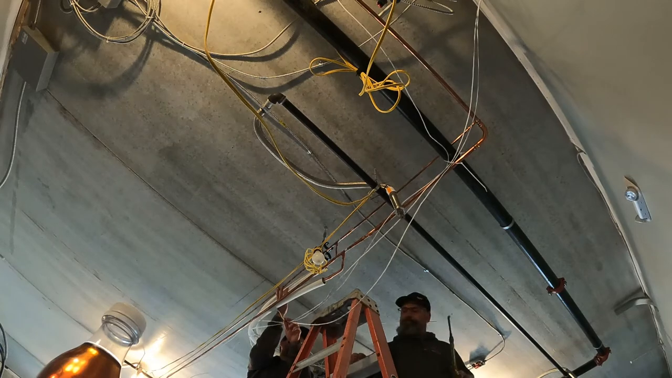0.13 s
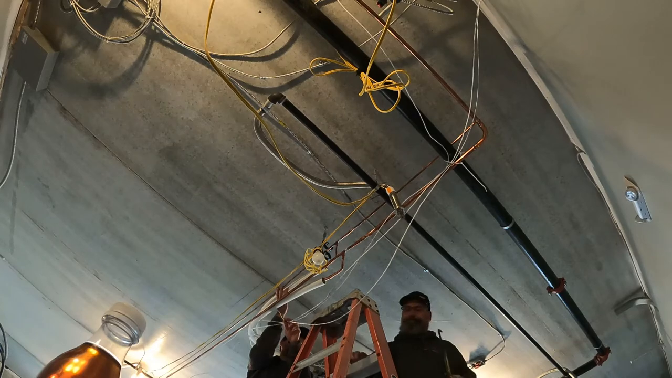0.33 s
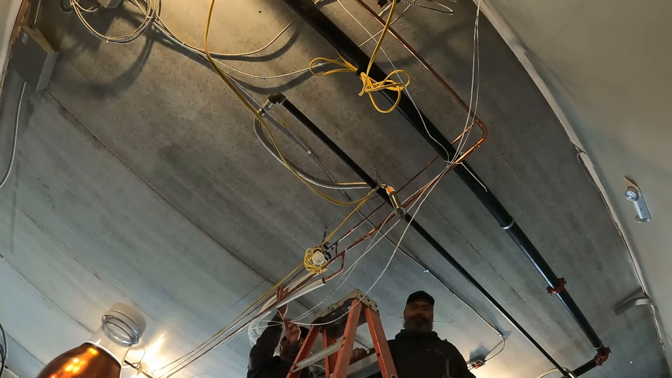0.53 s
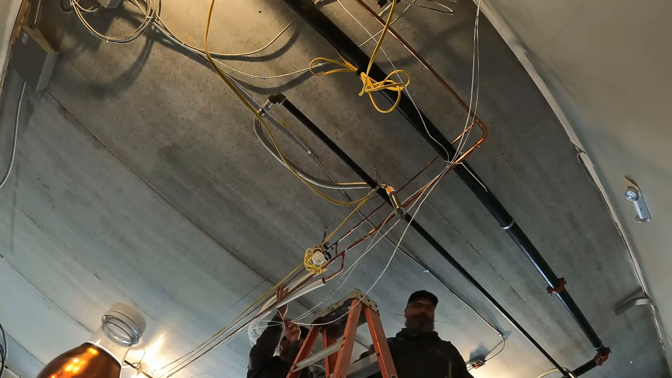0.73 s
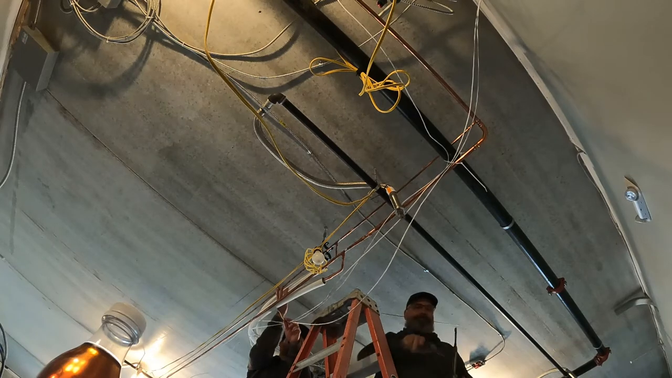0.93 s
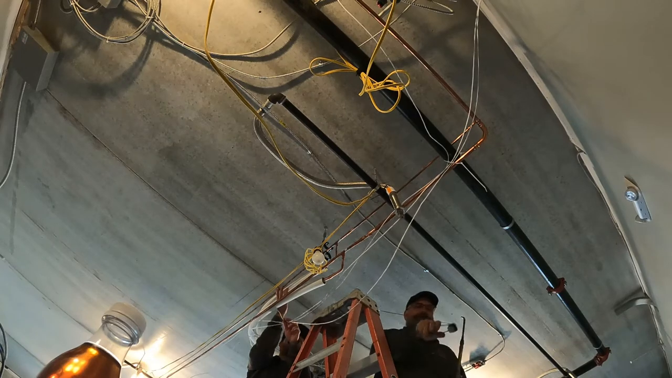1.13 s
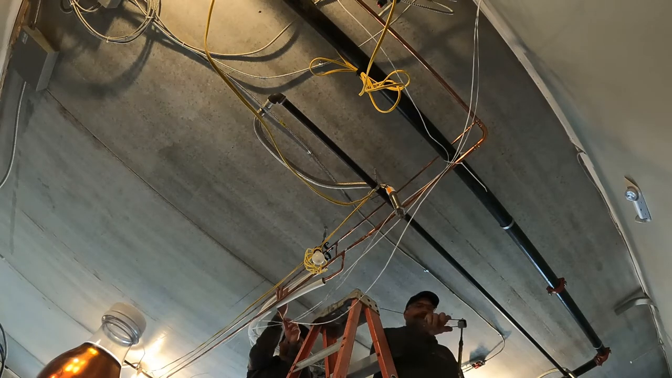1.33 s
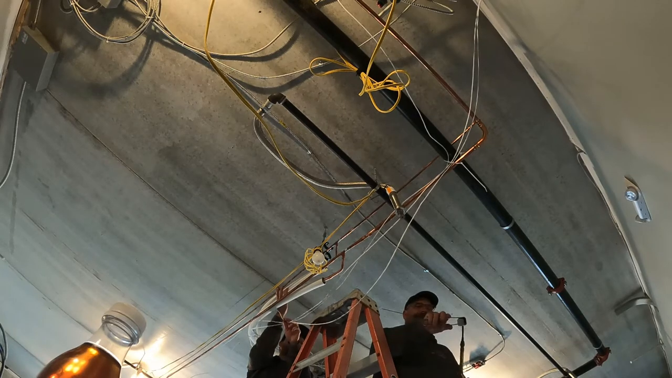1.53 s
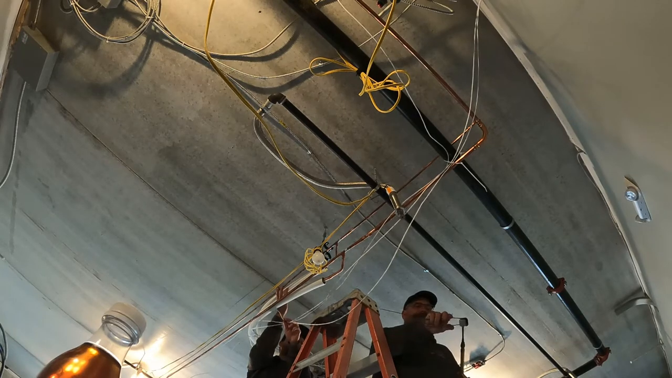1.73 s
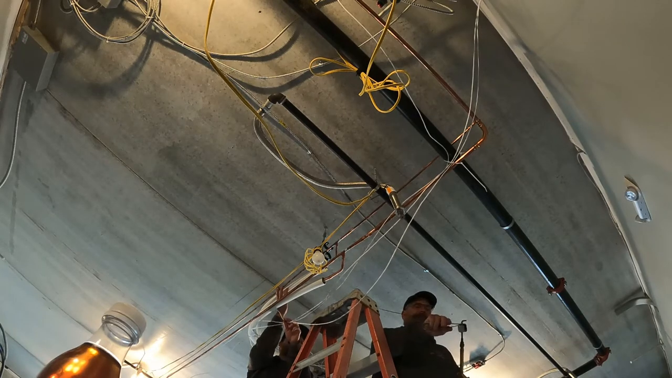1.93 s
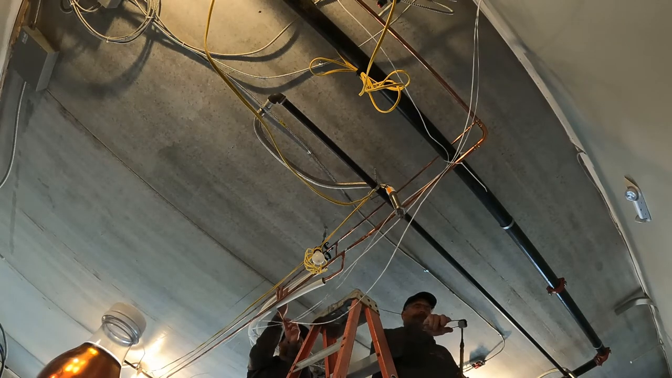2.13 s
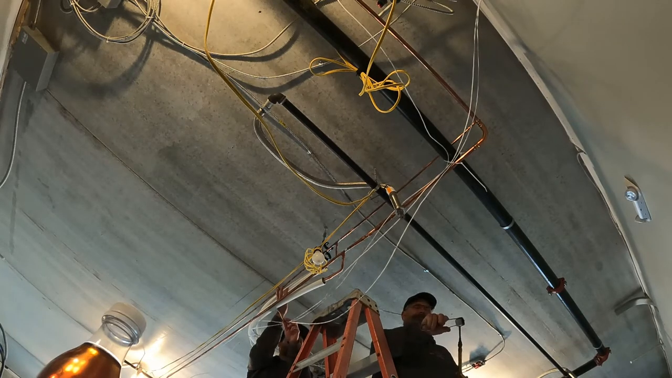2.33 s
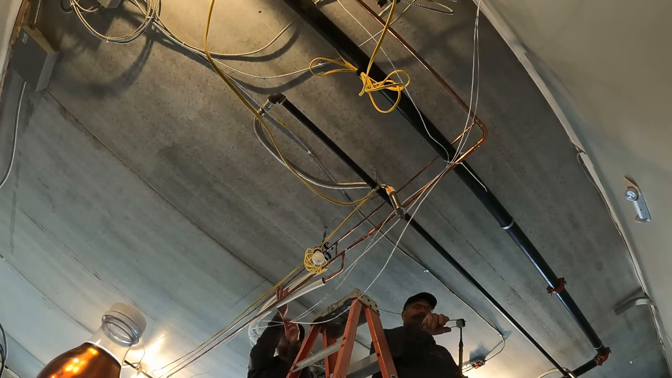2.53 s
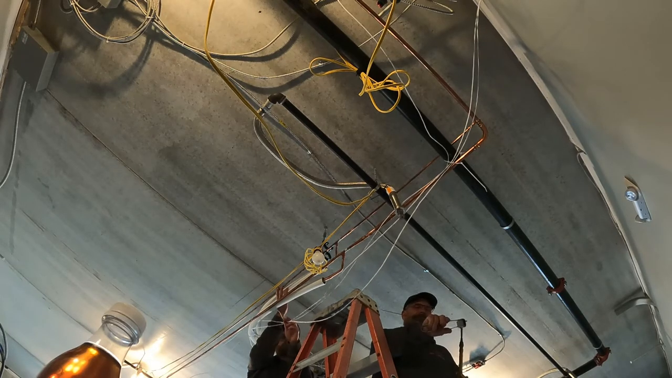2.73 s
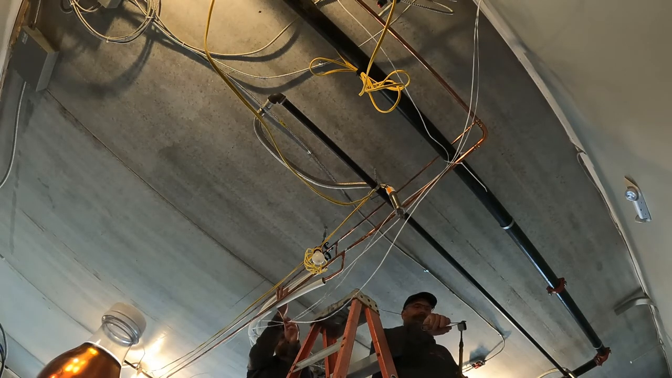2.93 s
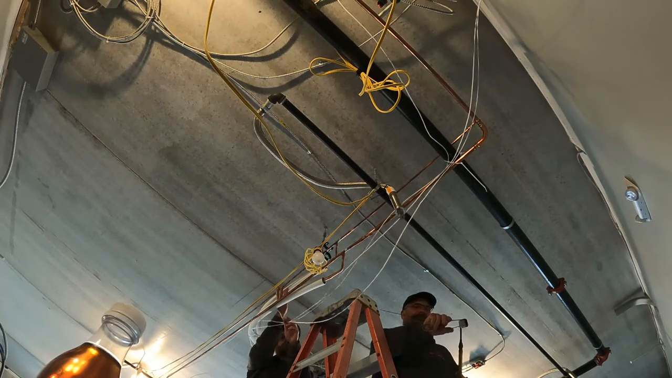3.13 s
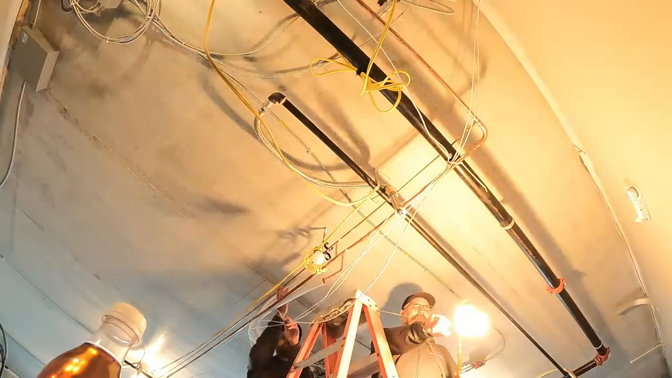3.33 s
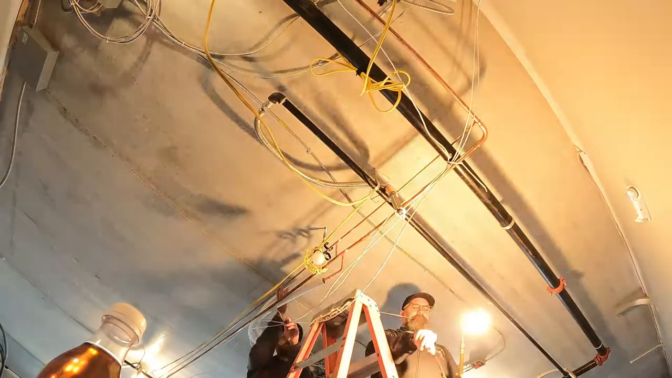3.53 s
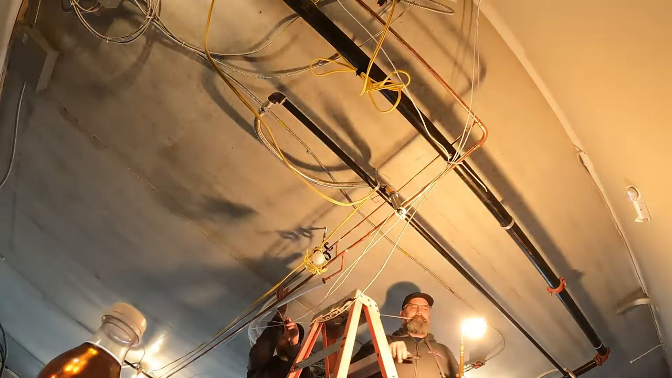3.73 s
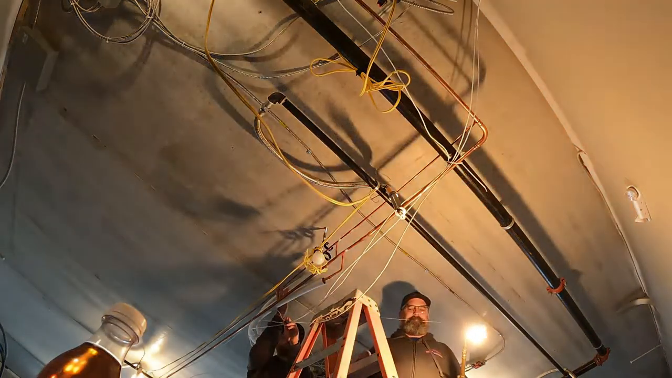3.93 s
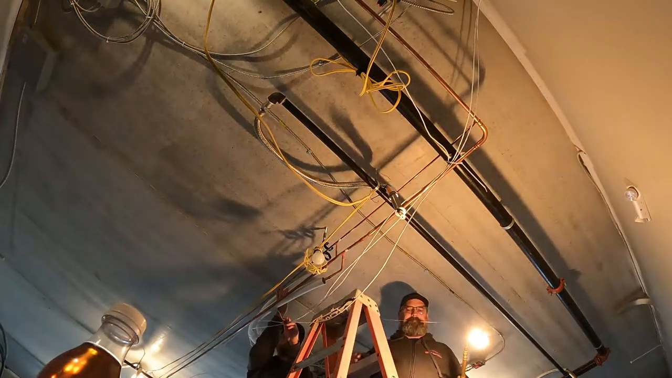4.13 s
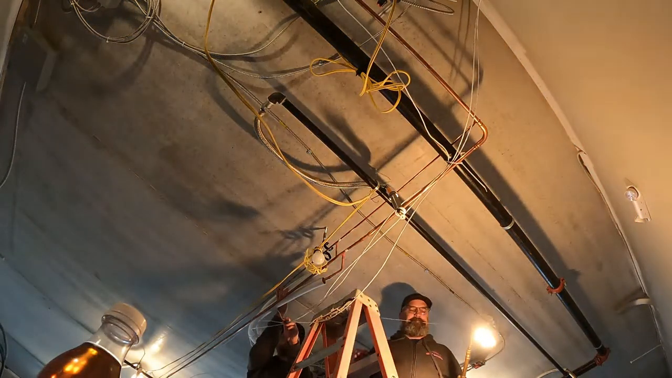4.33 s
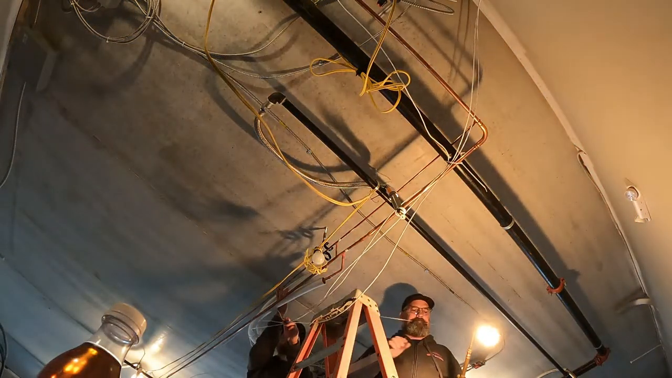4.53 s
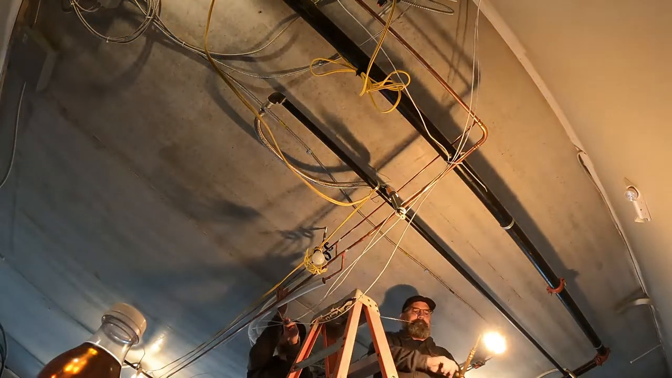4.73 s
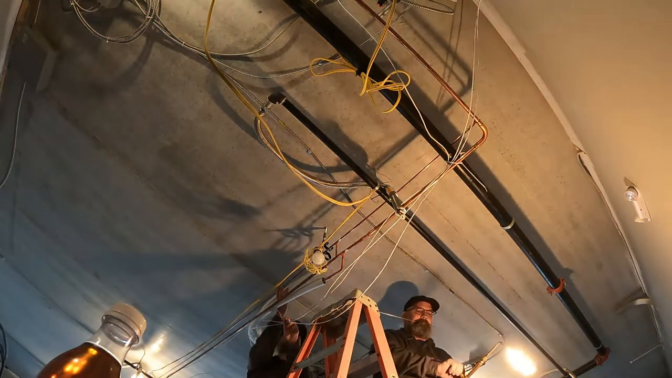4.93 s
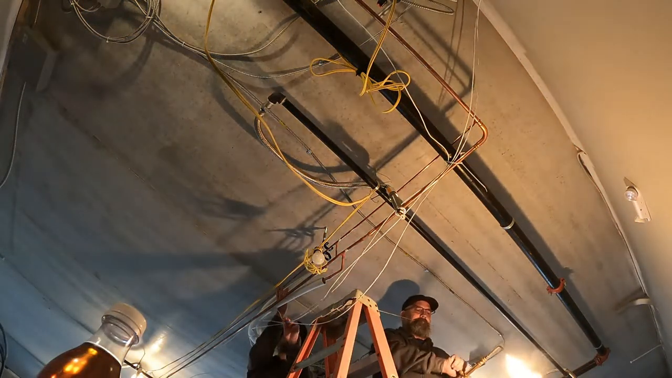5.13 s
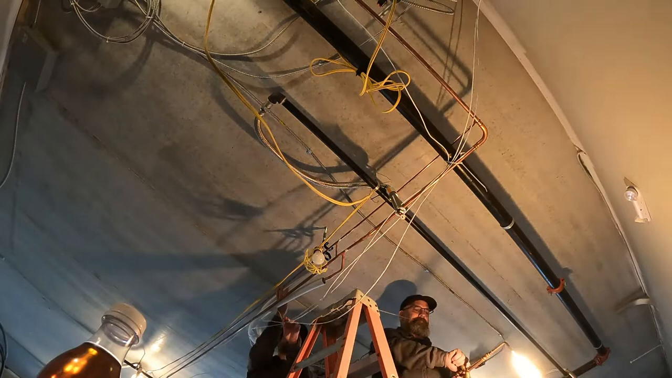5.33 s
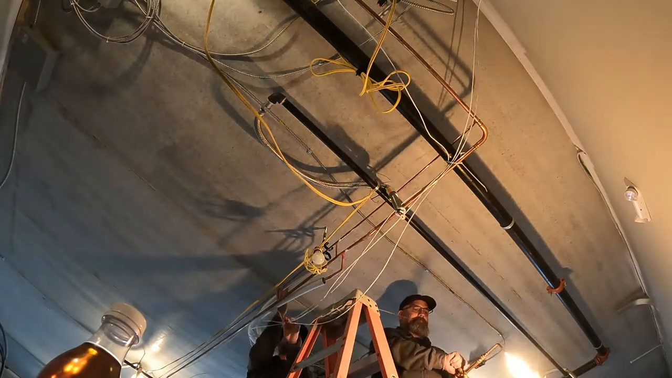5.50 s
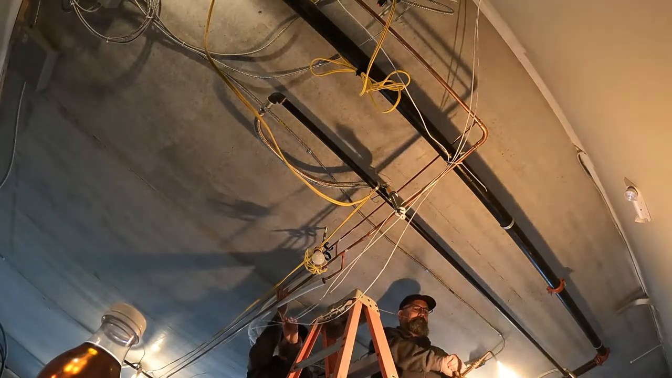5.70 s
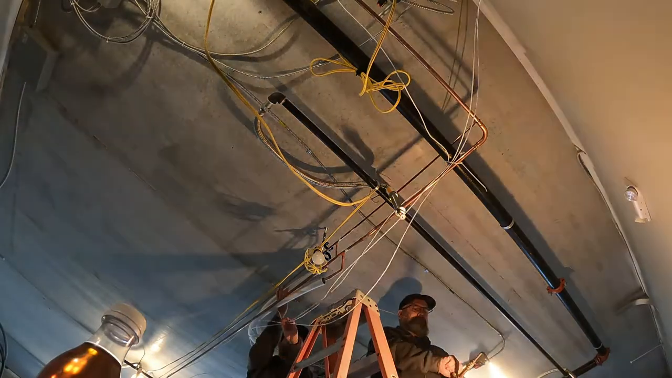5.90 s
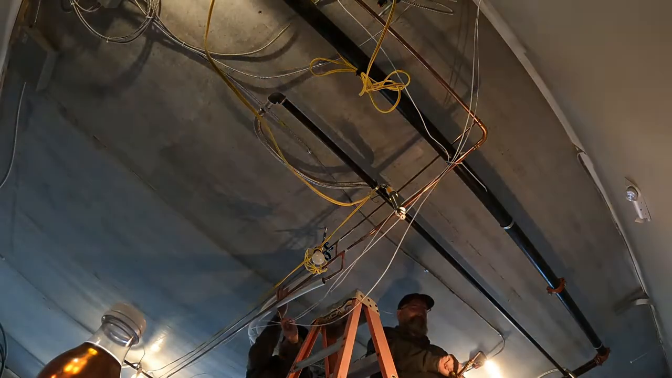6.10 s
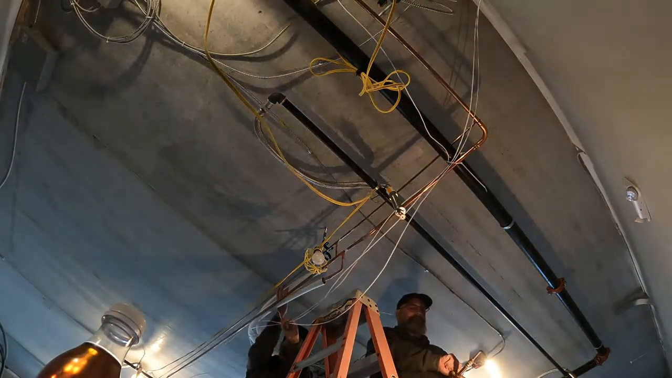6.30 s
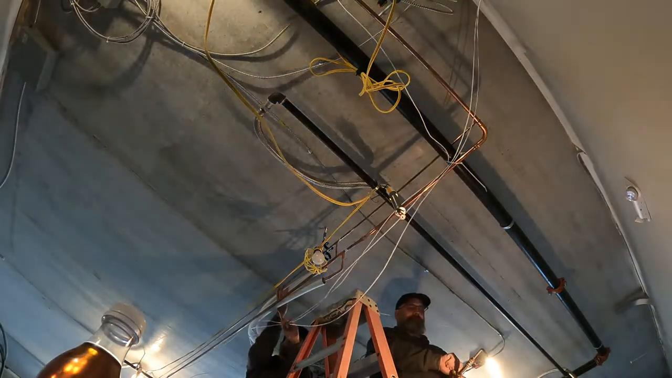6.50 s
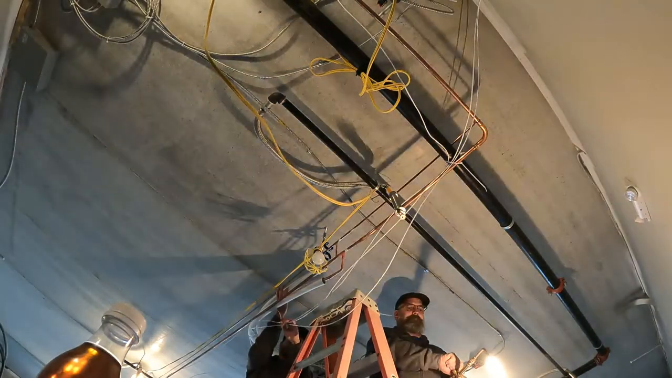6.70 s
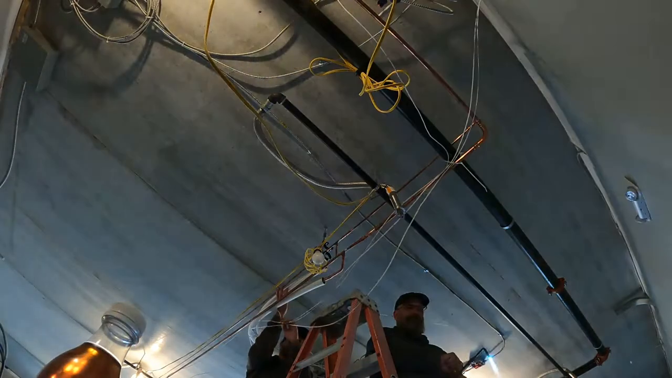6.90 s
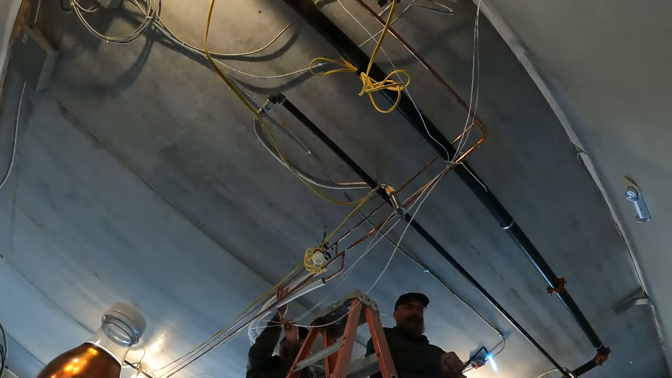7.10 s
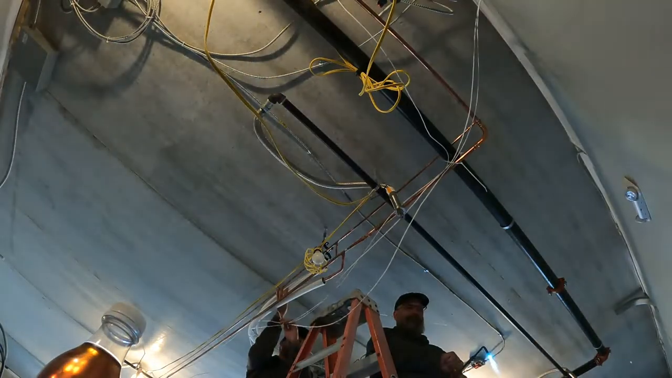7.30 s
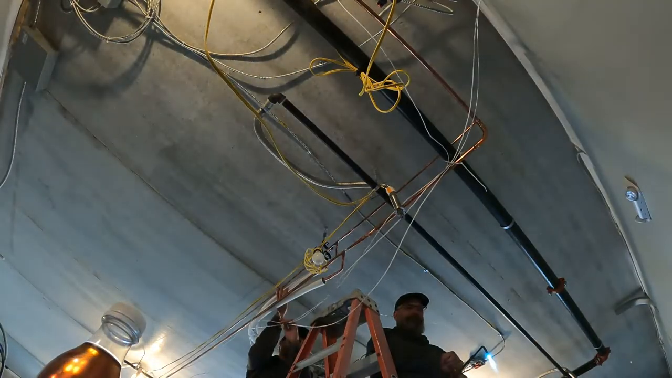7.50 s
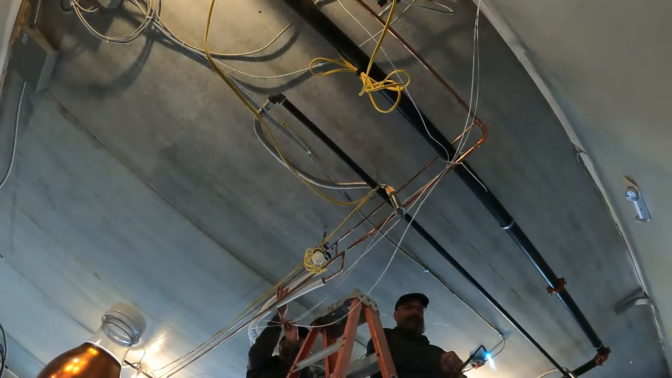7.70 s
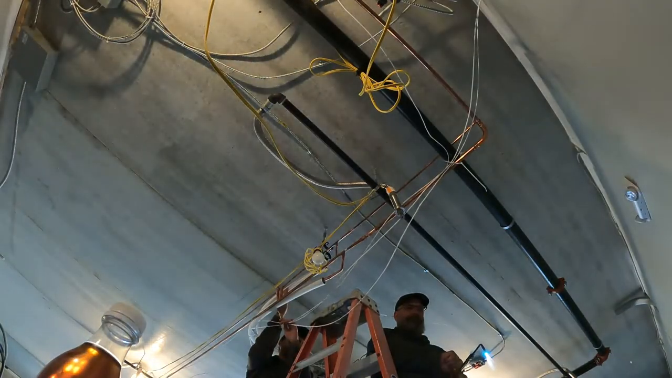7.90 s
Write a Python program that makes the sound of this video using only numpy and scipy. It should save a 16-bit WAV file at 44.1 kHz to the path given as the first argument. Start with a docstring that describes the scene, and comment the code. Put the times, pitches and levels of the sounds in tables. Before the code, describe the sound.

A hard, reverberant work room with faint hum and rumble; a tool rattles lightly on a ladder. A flint striker rasps and snaps in quick strokes until the gas ignites with a boom. A loose yellow flame roars and flutters, metal clanks loudly, the flame spits and dies away. After a thin whistle, a sharper blue flame hisses steadily. The microphone stands a little way off, nearly mono.

```python
"""In a bare, echoing room a soft hiss fades over a faint hum, a tool rattles on a ladder, and a motor stops.
A flint striker is squeezed and released: gritty noise and taps ring its steel. The gas catches with a boom.
A soft yellow flame of flickering noise roars, is turned down among metal clanks, spits and dies away.
A thin whistle leads to a sharp blue flame: a roar, a jet hiss and a sizzle, each its own coloured noise.
Throughout, the ceiling returns a quick echo of the metal, and the walls a long tail of all near sounds."""
import sys
import numpy as np
from scipy import signal
from scipy.fft import rfft, irfft, next_fast_len
from scipy.io import wavfile
from scipy.ndimage import uniform_filter1d

SR = 44100
rng = np.random.default_rng(int(sys.argv[2]) if len(sys.argv) > 2 else 0)


def wav_out(sig):
    """Save sig, one row per channel (or a flat mono array), as 16-bit PCM at SR to the path in sys.argv[1]."""
    wavfile.write(sys.argv[1], SR, np.round(np.clip(np.atleast_2d(sig).T, -1, 1) * 32767).astype(np.int16))


N = 355049
T = np.arange(N) / SR  # time in seconds


def undb(db):
    """Turn decibels into a plain multiplier."""
    return 10 ** (np.asarray(db) / 20)


def colour(x, points):
    """Filter by (pitch_hz, level_db) points, falling 24 dB per octave more outside them."""
    hz, db = np.transpose(points)
    size = next_fast_len(len(x))
    f = np.fft.rfftfreq(size, 1 / SR) + 1
    octaves_outside = np.maximum(np.log2(hz[0] / f), 0) + np.maximum(np.log2(f / hz[-1]), 0)
    gain = undb(np.interp(np.log(f), np.log(hz), db) - 24 * octaves_outside)
    return irfft(rfft(x, size) * gain, size)[:len(x)]


def unit(x):
    """Scale a sound to an average (rms) level of 1."""
    return x / np.sqrt(np.mean(x ** 2))


def hiss(points):
    """Steady noise with the given colour, at rms level 1."""
    return unit(colour(rng.standard_normal(N), points))


def walk(rate):
    """Wandering random levels: `rate` new ones per second, smoothed twice; spread near 1."""
    k = int(SR / rate)
    steps = np.repeat(rng.standard_normal(N // k + 1), k)
    smooth = uniform_filter1d(uniform_filter1d(steps, k), k)
    return 1.3 * smooth[:N]


def ring(x, modes):
    """Metal rings as damped resonators side by side; a unit tap starts each at its own dB."""
    out = 0
    for k, (hz, width, db) in enumerate(modes):
        r, w = np.exp(-np.pi * width / SR), 2 * np.pi * hz / SR
        tone = np.sin(w) * signal.lfilter([1], [1, -2 * r * np.cos(w), r * r], x)
        out = out + (-1) ** k * undb(db) * tone  # every other mode is flipped
    return out


def bursts(rows, texture, rise_s):
    """Short contacts that rise, then fade over their length; rows are (start_s, level_db, length_s)."""
    shape = np.zeros(N)
    for s, db, length in rows:
        t = np.arange(int(length * SR)) / SR
        start = int(s * SR)
        shape[start:start + len(t)] += undb(db) * np.minimum(t / rise_s, 1) * (1 - (t / length) ** 2)
    return shape * texture


def grit(scatter_db):
    """Dense contacts of uneven size, as noise whose strength jumps about."""
    sizes = undb(scatter_db * np.minimum(rng.exponential(size=N), 5))
    return unit(rng.standard_normal(N) * sizes)


# Strokes of the striker, levels relative. Columns: touch_s (flint touches), scrape_db,
# stop_s (arm hits its stop), snap_db, squeezed (1 squeezed, 0 released)
STROKES = [(1.901, -38, 1.946, -26.5, 0), (2.108, -21.5, 2.121, -17, 1), (2.274, -37.5, 2.305, -18.5, 0),
           (2.447, -21.5, 2.461, -15.5, 1), (2.660, -31.5, 2.691, -19, 0), (2.826, -20.5, 2.837, -16.5, 1),
           (2.975, -33.5, 3.0033, -18.5, 0), (3.148, -21.5, 3.161, -12.5, 1), (3.31, -29, 3.343, -27.5, 0),
           (3.458, -24.5, 3.477, -22, 1)]
TOUCH_S, TOUCH_DB, BITE_S = 0.0031, -7.5, 0.0064  # squeezed: a light touch, then the flint bites
# released: the flint drags back for a share of the stroke, then skids just before the stop
DRAG_SHARE, SKID_S, SKID_DB = 0.49, .007, -33


def scrapes():
    """Flint rubbing on the file in every stroke, as rows (start_s, level_db, length_s)."""
    rows = []
    for s, db, stop, _, squeezed in STROKES:
        if round(squeezed):
            rows += [(s, db + TOUCH_DB, TOUCH_S), (s + TOUCH_S, db, BITE_S)]
        else:
            rows += [(s, db, DRAG_SHARE * (stop - s)), (stop - SKID_S, SKID_DB, SKID_S)]
    return rows


# Ringing of the steel cup and arm, levels relative.
# Columns: pitch_hz, width_hz, scraped_db, released_db, squeezed_db
STEEL_MODES = [(1460, 660, -14.5, -19.5, -16.5), (2616, 980, -7, -8.5, -1.5), (3100, 360, 0, 2, -1.5),
               (3770, 270, -2, -2, -18), (4940, 190, -8, -3.5, -4.5), (5270, 450, -5, -2, -5.5),
               (7120, 220, -20, -9, 0), (7800, 220, -26.5, -13.5, -1.5), (8740, 180, -16.5, -7.5, -5.5),
               (13200, 450, -22, -17.5, -4.5)]
# Bare rasp of the flint between the ringing pitches. Columns: pitch_hz, level_db (per Hz, relative)
RASP = [(900, -29.5), (2200, -15), (2900, 6), (4200, 2), (5300, -10), (6200, -13), (8500, -28),
        (10500, -16), (15500, -25.5)]
# Bare tick of the arm. Columns: pitch_hz, level_db (relative)
SNAP = [(900, -20), (2500, -7), (5500, -4.5), (6300, -9), (9000, -1), (12500, 2.5), (15500, -3.5)]


def striker():
    """Scrapes and snaps ring the same steel, each favouring other modes, over bare rasping and ticks."""
    steel = np.array(STEEL_MODES)
    teeth = grit(1.2)
    out = undb(-16.5) * ring(bursts(scrapes(), teeth, 0.0017), steel[:, [0, 1, 2]])
    out = out + undb(-4.0) * bursts(scrapes(), hiss(RASP), 0.0026)
    for squeezed in (0, 1):
        rows = [(stop, db, .004) for _, _, stop, db, way in STROKES if round(way) == squeezed]
        taps = bursts(rows, undb(-21) * teeth, .0005)  # the arm chatters after the blow
        blows = [int(s * SR) for s, _, _ in rows]
        taps[blows] += undb([db for _, db, _ in rows])
        out = out + undb(-8.0) * ring(taps, steel[:, [0, 1, 3 + squeezed]])
        out = out + undb(6.5) * colour(taps, SNAP)
    return out


# Rumble as the rest of the gas burns off. Columns: pitch_hz, level_db (per Hz, relative)
BOOM_RUMBLE = [(20, -14.5), (42, 3), (60, -12.5), (110, -8), (190, 3.5), (400, 1.5), (750, -12), (1000, -2),
               (1300, -11), (1900, -24), (2400, -17.5), (5000, -33.5), (15000, -56)]
BOOM_S, BOOM_DB = 3.3195, 0.5
CRACK_COLOUR = [(800, 2.0), (2500, -0.5), (9000, -24.5), (15000, -29.0)]  # pitch_hz, level_db


def boom():
    """The gas cloud burns at once: a crack, a suck and push of air, then a rumble as the rest burns off."""
    t = T - BOOM_S
    push = -np.sin(2 * np.pi * 180 * (t - .002)) * ((t > .002) & (t < .0075))
    crack = bursts([(BOOM_S, -12, .009)], hiss(CRACK_COLOUR), 0.0013)
    after = np.maximum(t, 0)
    fade = np.exp(-after / 0.0092) + undb(-7) * np.exp(-after / 0.13)  # a fast and a slow fade
    rumble = undb(-7.5) * hiss(BOOM_RUMBLE) * np.clip(t / 0.0011, 0, 1) * fade
    return undb(BOOM_DB) * (push + crack + rumble)


# Course of the yellow flame, levels relative. Columns: time_s, roar_db, crackle_db
YELLOW_COURSE = [(3.31, -87, -80), (3.33, -30.5, -42), (3.55, -30, -38.5), (3.9, -31.5, -38.5),
                 (4.0, -34.5, -48), (4.5, -37.5, -56), (4.85, -36, -53), (5.6, -37, -53.5),
                 (5.9, -33.5, -48), (6.02, -39.5, -64), (6.1, -61, -72), (6.4, -75.5, -88)]
# Colours of its roar, crackle and low flutter. Columns: pitch_hz, level_db (per Hz, relative)
YELLOW_ROAR = [(53, -54), (90, -12.5), (124, -10), (193, 0.5), (327, -7), (363, -1), (390, -8.5), (420, -1),
               (508, -5.5), (606, -3.5), (969, 0.5), (1440, -12), (1740, -12.5), (2200, -18), (3000, -19.5),
               (3900, -24), (6600, -120)]
CRACKLE = [(1060, -35.5), (1800, -4.5), (2680, 1.5), (3260, -3.5), (3840, 1), (4390, -7.5), (4940, -6),
           (10300, -25.5), (13300, -28), (15500, -35.5)]
FLUTTER = [(18, -19.5), (28, 8), (42, 6.5), (65, 7.5), (90, -25.5)]
FLUTTER_DB, FLUTTER_WANDER_DB = -17, 5.5  # flutter level beside the roar, and how far it wanders
FLARE_DB, FLARE_S = 24.5, .15  # extra flutter as the flame flares up, and its fading time


def yellow_flame(flicker):
    """Turbulent burning of rich gas: a flickering roar, uneven crackles and a low flutter."""
    s, *levels = np.transpose(YELLOW_COURSE)
    roar_db, crackle_db = (np.interp(T, s, db) for db in levels)
    roar = flicker * undb(roar_db) * hiss(YELLOW_ROAR)
    sparks = unit(colour(grit(2.5), CRACKLE)) * undb(1.6 * walk(40))
    flare_db = FLARE_DB * np.exp(-np.maximum(T - BOOM_S, 0) / FLARE_S)
    flutter = undb(roar_db + FLUTTER_DB + flare_db + FLUTTER_WANDER_DB * walk(4)) * hiss(FLUTTER)
    return roar + undb(crackle_db) * sparks + flutter


# The flame spits as the mixture is changed. Columns: start_s, level_db (relative)
SPIT_TIMES = [(5.712, -41), (5.746, -40), (5.782, -41), (5.887, -50), (5.905, -44)]
# Colour of the spits. Columns: pitch_hz, level_db (per Hz, before a second filter)
SPIT_COLOUR = [(3000, 0), (4100, 0)]
# Hiss under the spits, one row. Columns: start_s, level_db (relative), length_s
SPUTTER = (5.68, -51, 0.32)
SPIT_S = 0.0073


def spits():
    """Brief puffs of burning gas over a longer, unsteady sputter, all cut from the same noise."""
    puffs = bursts([(s, db, SPIT_S) for s, db in SPIT_TIMES], 0.96, .0018)
    sputter = bursts([SPUTTER], undb(3.0 * walk(90)), .03)
    noise = (puffs + sputter) * hiss(SPIT_COLOUR)
    return undb(7) * colour(noise, [(2600, -6), (4500, -7.5)])


# Roar, jet hiss and sizzle, in that order: each swells from silence, then holds.
# Columns: start_s, swell_s, held_db (relative)
BLUE_SWELLS = [(6.89, 0.096, -40), (6.93, 0.054, -55), (6.88, 0.12, -58)]
# Colours of the three layers. Columns: pitch_hz, level_db (per Hz, relative)
BLUE_ROAR = [(59, -58.5), (100, -25), (198, -5), (302, -15.5), (327, -9), (424, -9), (493, -15.5),
             (596, -7), (783, -9.5), (948, 0), (1450, -18.5), (1570, -10), (2010, -22.5), (2210, -17.5),
             (2600, -34), (3380, -58.5), (5720, -120)]
JET = [(1410, -20), (2400, -3), (3230, -1), (3370, -1.5), (3660, 1), (4110, -4.5), (5070, -4.5),
       (5420, -4.5), (7000, -9), (9100, -37), (15400, -120)]
SIZZLE = [(3820, -29), (6500, -7), (7970, -2), (10000, -7.5), (13700, -7.5), (15100, -9), (15800, -17.5)]
SETTLE_DB, SETTLE_S = -4, 0.17  # the mixture starts a little weak, then settles
OXYGEN_S, OXYGEN_DB = 6.865, -61  # the jet first hisses softly, before the flame turns blue


def blue_flame(flicker):
    """A lean flame burns as a flickering roar, with a jet hiss and a sizzle on top."""
    layers = []
    for s, swell, db in BLUE_SWELLS:
        settle_db = SETTLE_DB * np.exp(-np.maximum(T - s - swell, 0) / SETTLE_S)
        rise = np.clip((T - s) / swell, 0, 1) ** 2
        layers.append(rise * undb(db + settle_db + 0.91 * walk(5)))
    roar, jet, sizzle = layers
    jet = jet + undb(OXYGEN_DB) * np.clip((T - OXYGEN_S) / .015, 0, 1)
    out = flicker * roar * hiss(BLUE_ROAR)
    out = out + jet * undb(1.0 * walk(22)) * hiss(JET)
    return out + sizzle * undb(1.5 * walk(45)) * hiss(SIZZLE)


def flames():
    """Both flames share one flicker, the uneven strength of turbulent burning."""
    flicker = undb(0.81 * walk(25) + 1.0 * walk(7.9))
    return yellow_flame(flicker) + spits() + blue_flame(flicker)


# Thin whistles from the nozzle as the gas is turned down.
# Columns: start_s, end_s, pitch_hz, width_hz, level_db (rms before the swell)
WHISTLES = [(5.97, 6.463, 667, 6.2, -54), (6.45, 6.95, 3940, 25, -78)]


def whistles():
    """Noise in a narrow resonance, swelling and fading."""
    air = rng.standard_normal(N)
    out = 0
    for start, end, hz, width, db in WHISTLES:
        swell = np.sin(np.pi * np.clip((T - start) / (end - start), 0, 1) ** 0.67)
        out = out + undb(db) * unit(ring(air, [(hz, width, 0)])) * swell
    return out


# A tool rattles on the ladder, levels relative. Columns: start_s, level_db, length_s, treble_db
CLANKS = [(0.208, -53, 0.011, -5), (0.533, -50.5, 0.022, -15), (0.548, -58, 0.011, 8),
          (0.555, -43, 0.017, 7.5), (0.569, -33, 0.033, -1), (4.202, -17, 0.014, -1.5),
          (4.299, -29.5, 0.011, 2)]
# Ringing of tool and ladder. Columns: pitch_hz, width_hz, level_db (relative)
LADDER_MODES = [(610, 14, -14), (792, 36, -6.5), (1050, 31, 0.5), (1294, 39, -4), (1485, 31, -2),
                (1817, 73, 1), (3060, 100, -3), (3370, 26, -14), (3720, 96, -2), (4230, 69, -17.5),
                (5340, 52, -16), (5750, 40, -15), (6390, 93, -18), (12200, 130, -22)]
# Bare contact noise between those pitches. Columns: pitch_hz, level_db (per Hz, relative)
CLATTER = [(560, -17), (700, -4), (1100, 4), (1700, -9.5), (2300, -12), (4000, -10), (7000, -17.5),
           (10000, -32), (15500, -38)]


def clanks():
    """Gritty contacts ring the metal; treble_db sets how strongly each wakes the upper modes."""
    contact, out = grit(4.7), 0
    for upper in (0, 1):  # below, then above 2100 Hz
        rows = [(s, db + upper * treble_db, length) for s, db, length, treble_db in CLANKS]
        modes = [m for m in LADDER_MODES if (m[0] > 2100) == upper]
        part = [(hz, db) for hz, db in CLATTER if (hz > 2100) == upper]
        out = out + undb(-27.5) * ring(bursts(rows, contact, 0.0037), modes)
        out = out + undb(-4.0 - 4.1 * upper) * bursts(rows, hiss(part), 0.003)
    return out


# Dry scuffs and ticks of handling. Columns: start_s, level_db, length_s, low_hz, high_hz
SCUFFS = [(.56, -58, 0.056, 8000, 15500), (4.075, -61, 0.11, 6000, 15000), (4.2, -39, 0.0081, 9000, 15500),
          (4.995, -65, 0.027, 5950, 14800), (6.702, -68, 0.011, 2000, 4970)]


def scuffs():
    """Light rubbing makes short puffs of noise between a low and a high edge."""
    out = 0
    for s, db, length, low_hz, high_hz in SCUFFS:
        out = out + bursts([(s, db, length)], hiss([(low_hz, 0), (high_hz, 0)]), 0.0018)
    return out


CEILING_S, CEILING_DB = .0043, 0


def ceiling(x):
    """A flat surface returns one quick echo."""
    return undb(CEILING_DB) * np.interp(T - CEILING_S, T, x, left=0)


# How long the walls keep sounding. Columns: pitch_hz, t60_s (time to fade by 60 dB)
WALLS = [(40, 1), (125, 0.66), (300, 1.21), (800, 1.24), (1500, 1.15), (2500, 1.23), (4000, 1.19),
         (7000, 0.81), (10000, .55), (15000, 0.57)]


def tail():
    """Echoes from the walls, energy 1: overlapping bands of noise, each fading with its own t60."""
    t, out = T[:2 * SR], 0
    log_hz = np.log(np.fft.rfftfreq(len(t), 1 / SR) + 1)
    place = np.interp(log_hz, np.log(np.array(WALLS)[:, 0]), np.arange(len(WALLS)))
    for k, (_, t60) in enumerate(WALLS):
        share = np.cos(np.pi / 2 * np.clip(place - k, -1, 1))
        band = irfft(rfft(rng.standard_normal(len(t))) * share, len(t))
        out = out + band * np.exp(-np.log(1000) * t / t60)
    onset = np.clip((t - .006) / 0.0023, 0, 1)
    out = colour(out * onset, [(20, 2.2), (3000, 0), (16000, -1.3)])
    return out / np.sqrt(np.sum(out ** 2))


# Colour of the far rumble. Columns: pitch_hz, level_db (per Hz, relative)
FAR_RUMBLE = [(12, -34), (20, -3), (65, -7.5), (86, -15.5), (110, -14.5), (142, -22.5), (168, -13),
              (410, -18), (446, -19.5), (660, -18), (825, -17), (1030, -21.5), (3440, -35.5), (5530, -37.5),
              (16000, -48.5)]
# Mains hum. Columns: pitch_hz, level_db (rms, before a slight wander)
HUM = [(59, -69), (120, -69)]
RUMBLE_DB = -59
MOTOR_HZ, MOTOR_DB, MOTOR_STOPS_S = 173.5, -68.5, 1.71


def site():
    """Far rumble is low noise; mains hum and a small motor that stops are wavering pure tones."""
    hum = sum(undb(db + 0.73 * walk(4.1)) * np.sin(2 * np.pi * hz * T) for hz, db in HUM)
    running = np.clip((MOTOR_STOPS_S - T) / .1, 0, 1)
    motor = undb(MOTOR_DB + 0.79 * walk(6)) * np.sin(2 * np.pi * MOTOR_HZ * T) * running
    rumble = undb(RUMBLE_DB + 1.1 * walk(5.8)) * hiss(FAR_RUMBLE)
    return rumble + np.sqrt(2) * (hum + motor)  # root 2 makes a tone's level its rms


# Colour of a soft hiss. Columns: pitch_hz, level_db (per Hz, relative)
RUSTLE_COLOUR = [(900, -4.5), (1500, -7), (4000, 7), (6000, -9.5)]
RUSTLE_DB, RUSTLE_FADE_DB_PER_S = -72.5, -7.5


def rustle():
    """Soft coloured noise that fades steadily from the start."""
    return undb(RUSTLE_DB + RUSTLE_FADE_DB_PER_S * T) * hiss(RUSTLE_COLOUR)


# Filter for the left-right difference. Columns: pitch_hz, level_db (side beside mid)
SIDE_DB = [(20, -55), (100, -72), (500, -64.5), (1000, -63.5), (2000, -40.5), (4000, -37), (8000, -21.5),
           (15500, -22.5)]
# Faint hiss, opposite in the two channels. Columns: pitch_hz, level_db (per Hz, relative)
SIDE_HISS = [(300, -6), (1500, -16), (4000, -2), (8000, -0.5), (15500, -3)]
SIDE_HISS_DB = -83.5


def scene():
    """Mix near sounds, echoes and background, then spread them over two channels."""
    steel, tool, gas, fire = striker(), clanks() + scuffs(), boom(), flames()
    direct = steel + tool + gas + undb(-2.5) * fire + ceiling(steel + tool)
    to_walls = undb(-3.5) * steel + undb(-3.0) * tool + undb(-13.0) * gas + undb(-8.5) * fire
    background = site() + whistles() + rustle()
    mid = direct + signal.fftconvolve(to_walls, tail())[:N] + background
    # the channels are nearly alike; a faint difference, mostly treble, gives slight width
    apart = np.interp(T - .003, T, direct + background) + signal.fftconvolve(to_walls, tail())[:N]
    side = colour(apart, SIDE_DB) + undb(SIDE_HISS_DB) * hiss(SIDE_HISS)
    return np.array([mid + side, mid - side])


TOP_HZ = 15900


def record(dry):
    """The loudest peaks are rounded off and the top is cut."""
    soft = .95 * np.tanh((np.abs(dry) / .95) ** 3) ** (1 / 3) * np.sign(dry)
    return signal.sosfilt(signal.ellip(10, .2, 70, TOP_HZ, fs=SR, output="sos"), soft)


dry = scene()
out = record(dry)
wav_out(out)
```